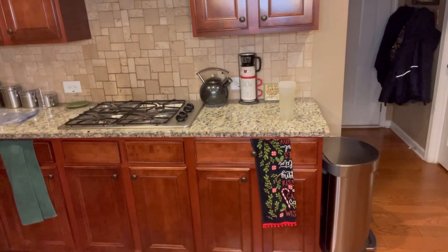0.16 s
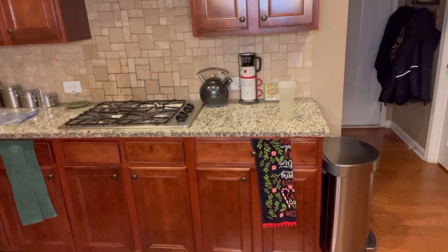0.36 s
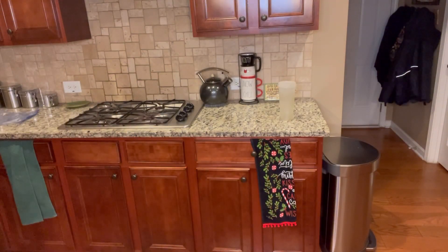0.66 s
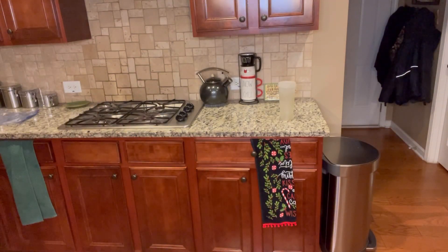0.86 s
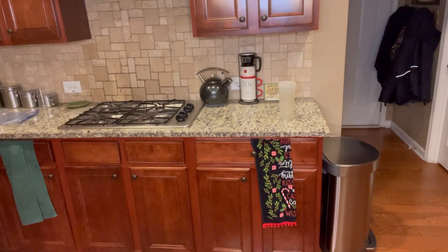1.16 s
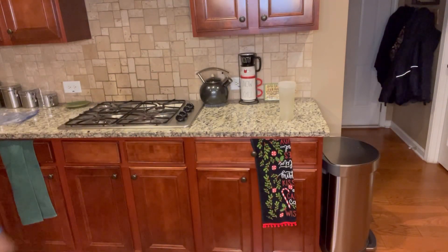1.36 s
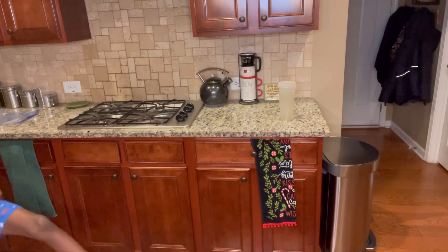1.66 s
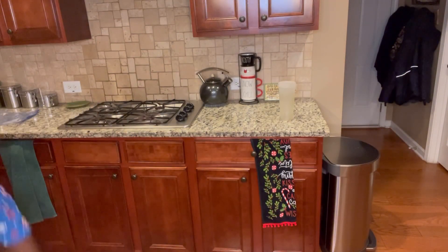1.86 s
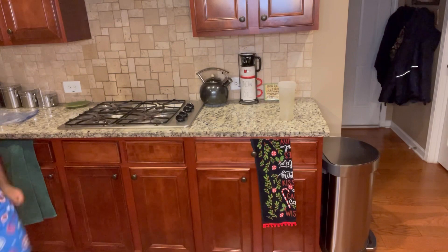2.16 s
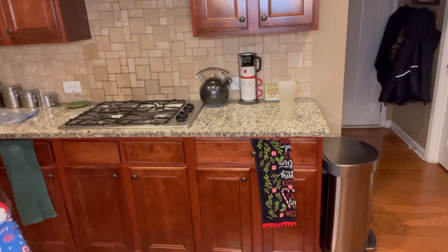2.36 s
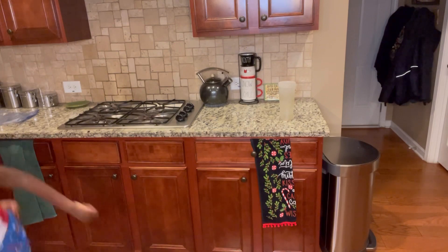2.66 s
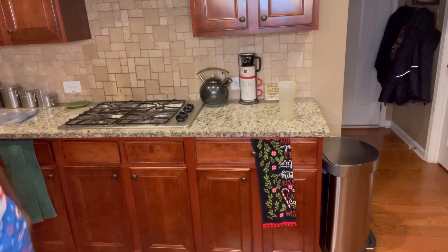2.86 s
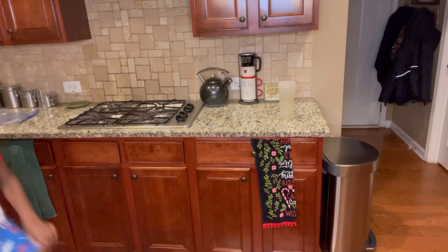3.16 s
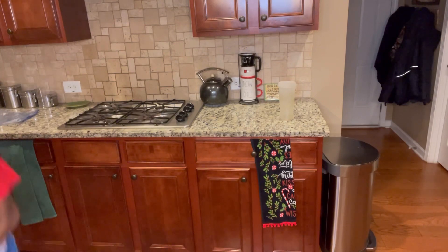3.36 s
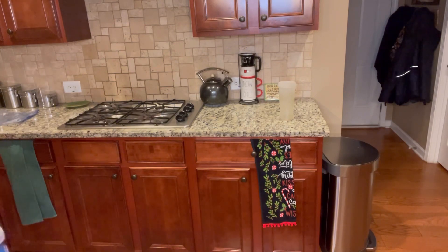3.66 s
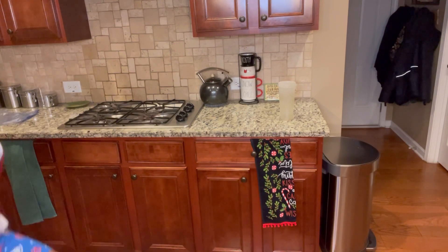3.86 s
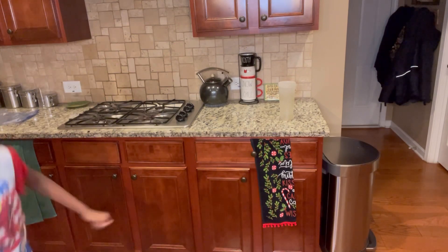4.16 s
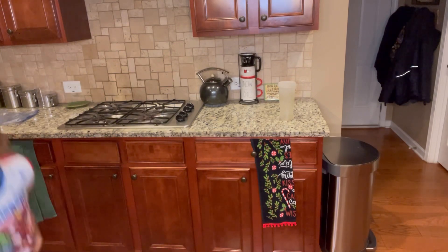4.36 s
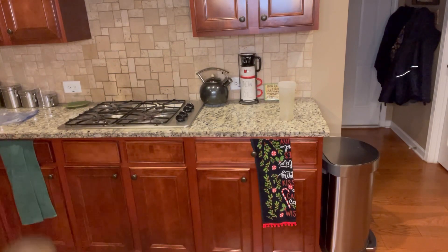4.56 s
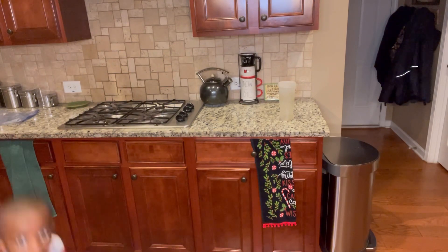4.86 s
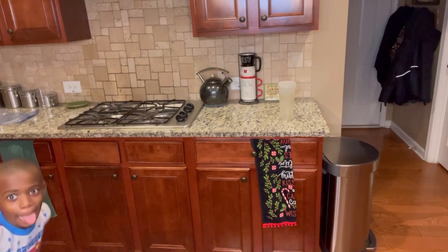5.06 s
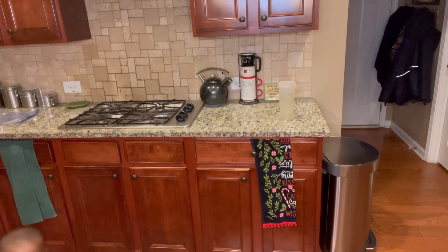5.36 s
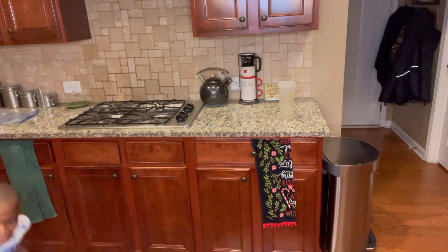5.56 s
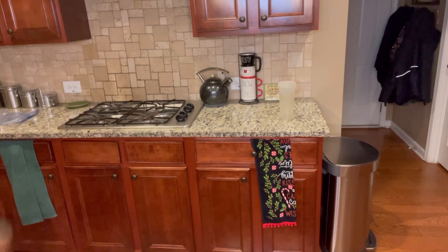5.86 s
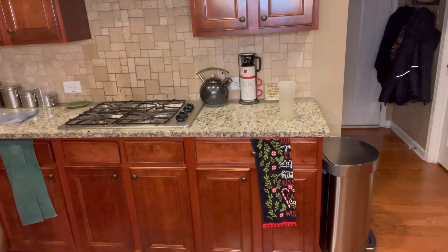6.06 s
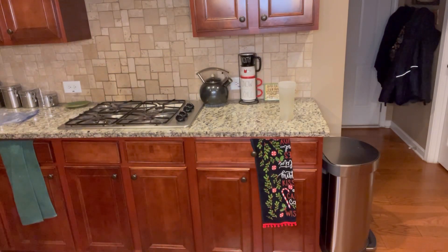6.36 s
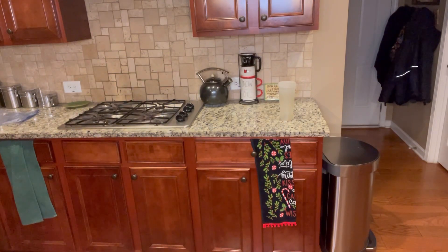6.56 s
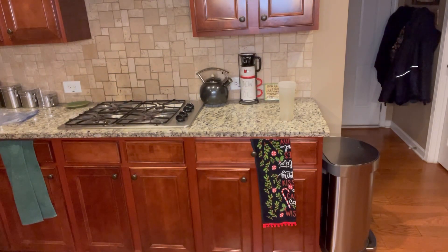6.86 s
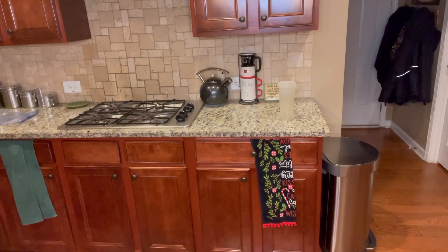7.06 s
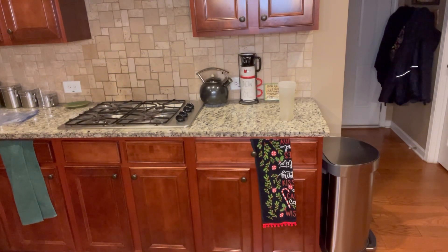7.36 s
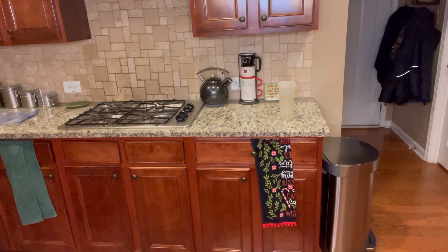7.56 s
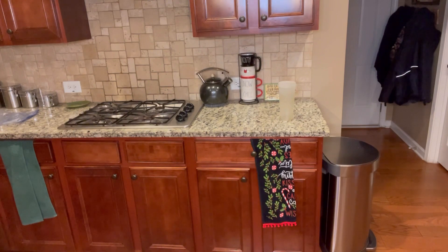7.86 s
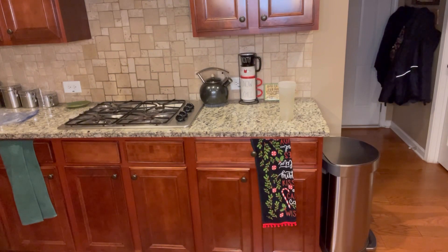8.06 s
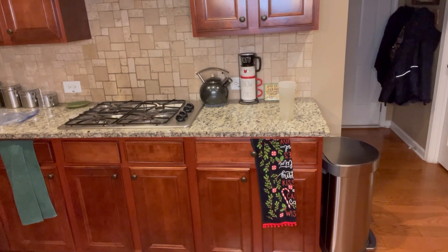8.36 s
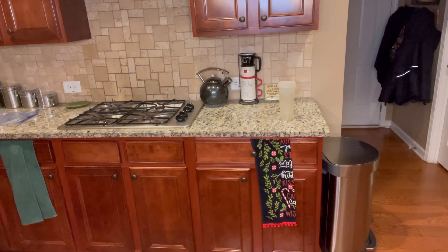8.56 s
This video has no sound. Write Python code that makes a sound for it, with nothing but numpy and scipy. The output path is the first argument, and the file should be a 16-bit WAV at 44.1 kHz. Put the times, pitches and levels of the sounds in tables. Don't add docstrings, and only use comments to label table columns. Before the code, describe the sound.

A reverberant home kitchen with faint low house rumble, heard in stereo from a phone near the cupboards. From 0.1 to 0.75 s objects shift on shelves in quick clicks, snaps and woody knocks, over dragging and a faint hollow hum around 340 Hz. A solid bare footfall lands at 0.87 s, with more thuds and knocks around 1.5 s. Lighter steps and cloth rubs continue to 3 s. From 3.1 to 4.2 s comes the busiest clatter: a drawer runs and rattles, hitting its stop at 3.68 s, then a bright hard strike at 4.04 s. Steps and scuffs follow at 4.4-5.2 s, with a tiny hinge squeak at 5.25 s and a knock at 5.44 s. It grows sparse after 6 s; drag and a footfall build from 7.1 s, and at 7.95 s a door slams sharply with a deep airy boom. A faint click closes around 8.5-8.65 s.

```python
import sys
import numpy as np
from scipy import signal
from scipy.fft import rfft, irfft, next_fast_len
from scipy.io import wavfile
from scipy.ndimage import uniform_filter1d

SR = 44100
rng = np.random.default_rng(int(sys.argv[2]) if len(sys.argv) > 2 else 0)


def ratio_of_db(decibels):
    return 10 ** (np.asarray(decibels, float) / 20)


def unload_audio(sound):
    columns = np.transpose(np.atleast_2d(sound))
    steps = np.round(np.clip(columns, -1, 1) * 32767)
    wavfile.write(sys.argv[1], SR, steps.astype(np.int16))


N = 384552
PORT_LAG = 20


def unit(x):
    return x / np.sqrt(np.mean(x ** 2) + 1e-20)


def smooth_noise(size):
    once = uniform_filter1d(rng.standard_normal(N), size=size)
    return unit(uniform_filter1d(once, size=size))


def along(points, hz):
    f, v = np.transpose(points)
    return np.interp(np.log(hz + 1), np.log(f + 1), v)


def resonances(hz, modes):
    total = 0
    for k, (centre, width, db) in enumerate(modes):
        damping = 1j * hz * width
        total = total + (-1) ** k * ratio_of_db(db) * damping / (centre * centre - hz * hz + damping)
    return total


def add(out, s, sound):
    part = out[:, round(s * SR):][:, :sound.shape[1]]
    part += sound[:, :part.shape[1]]


# (frequency [Hz], t60 [s])
ROOM_DECAY = [(60, 0.26), (150, 0.66), (1000, 0.73), (4000, 0.66), (8000, 0.52), (14000, 0.43)]


def rooms(count, wet_db, early_db, early_t60):
    hz, t = np.fft.rfftfreq(256, 1 / SR), np.arange(175) * 128 / SR
    z = rng.standard_normal((count, 2, len(hz), 2 * len(t))).view(complex) / 16
    decay = ratio_of_db(-60 * t / along(ROOM_DECAY, hz)[:, None])
    tail = signal.istft(z * decay, SR, window="cosine", nperseg=256)[1]
    t = np.arange(tail.shape[2]) / SR
    early = 1 + ratio_of_db(early_db - 60 * t / early_t60)
    build = 1 - np.exp(-t / 0.0012)
    tail = ratio_of_db(wet_db) * tail * early * build * (1 - (t / t[-1]) ** 4)
    tail[:, 1, 0] += 1
    tail[:, 0, PORT_LAG] += 1
    return tail


# (time [s], slap level [dB], thump level [dB], edge level [dB], slap pitch [Hz])
FOOTSTEPS = [(0.869, -8.5, -29.5, -63, 257), (1.514, -17.5, -42, -34.5, 215), (1.684, -34, -67, -49.5, 350),
             (1.93, -32, -35, -54, 296), (2.281, -26, -38, -45, 212), (2.643, -35, -38.5, -50.5, 460),
             (2.977, -21, -29, -39, 252), (4.48, -21, -26, -50.5, 365), (5.155, -16.5, -28, -44, 296),
             (5.786, -43, -41, -72, 205), (5.85, -49, -39, -58, 650), (6.243, -43, -44.5, -63, 200),
             (7.604, -20.5, -30.5, -47.5, 249)]
# (time [s], knock level [dB], thump level [dB], pitch [Hz])
DOOR_KNOCKS = [(0.406, -37, -49, 304), (0.638, -25.5, -42.5, 316), (1.458, -34, -65, 217),
               (2.198, -45.5, -69, 420), (2.485, -37, -70, 334), (3.638, -19, -37, 242),
               (3.944, -24.5, -69, 330), (5.441, -31.5, -54, 317), (6.093, -40.5, -65, 327),
               (6.96, -35, -68, 201), (7.121, -40, -68, 292), (7.679, -30.5, -59, 290),
               (8.518, -41, -61, 337)]
# (time [s], knock level [dB], thump level [dB], edge level [dB], pitch [Hz])
SHIFTED_THINGS = [(0.141, -36.5, -56, -50, 690), (0.296, -36.5, -66, -35.5, 670),
                  (0.446, -30.5, -57, -58, 654), (0.494, -38, -46, -36, 331), (0.699, -35, -57, -43.5, 604),
                  (3.382, -26.5, -62.5, -43.5, 525), (3.569, -24, -61, -30.5, 462),
                  (3.87, -29, -49, -31.5, 426), (4.416, -31.5, -51.5, -40.5, 595),
                  (4.734, -33, -55, -42, 627), (7.826, -35, -45, -40, 296)]
# (time [s], knock level [dB], thump level [dB], edge level [dB], pitch [Hz])
OPEN_STRIKES = [(0.221, -32, -66, -55, 650), (3.163, -31.5, -76.5, -36, 796), (3.361, -25, -41, -43, 757),
                (3.679, -17, -39.5, -23.5, 445), (4.039, -11.5, -34, -18.5, 461),
                (8.653, -70, -72, -44.5, 810)]
# (frequency [Hz], width [Hz], level [dB])
FLOORBOARDS = [(65, 11, -9), (117.8, 9.1, 7), (179, 18, -11)]
# (frequency over pitch [ratio], width over pitch [ratio], level [dB])
PANEL = [(0.979, 0.12, 5), (1.382, 0.36, -1.5), (2.7, 0.8, -18.5), (0.56, 0.14, 0.5)]


def knocks():
    blows = [(*row, -10) for row in FOOTSTEPS]
    blows += [(s, db, thump, db - 17.5, hz, -2.5) for s, db, thump, hz in DOOR_KNOCKS]
    blows += [(*row, -16) for row in SHIFTED_THINGS]
    blows += [(*row, -5) for row in OPEN_STRIKES]
    heel_s = 0.01765
    softness = 3.87
    boards_near_db, boards_wet_db = 4.5, -5
    out = np.zeros((2, N))
    answers = rooms(count=len(blows), wet_db=-22.0, early_db=8.0, early_t60=0.18)
    m = next_fast_len(answers.shape[2] + SR // 8)
    hz = np.fft.rfftfreq(m, 1 / SR)
    lag = np.exp(-2j * np.pi * hz * PORT_LAG / SR)
    direct = np.array([lag, lag ** 0])
    floor = resonances(hz, FLOORBOARDS) / (1 + 1j * hz / 250) ** 2
    floor = floor * np.exp(-2j * np.pi * hz * heel_s)
    edge = resonances(hz, [(970, 520, 4.5), (1157, 43, 8.5), (1500, 7300, -8.0)]) / (1 + 1j * hz / 2500)
    for (s, knock_db, thump_db, edge_db, pitch, near_db), answer in zip(blows, answers):
        path = rfft(answer, m) + ratio_of_db(near_db) * direct
        modes = [(pitch * ratio, pitch * width, db) for ratio, width, db in PANEL]
        panel = resonances(hz, modes) / (1 + 1j * hz / (softness * pitch)) ** 2
        boards = ratio_of_db(thump_db + 45) * floor * (ratio_of_db(boards_near_db) + ratio_of_db(boards_wet_db) * path)
        wood = ratio_of_db(knock_db + 22.5) * panel + ratio_of_db(edge_db + 20.0) * edge
        add(out, s, irfft(boards + path * wood, m)[:, :answer.shape[1]])
    return out


# (time [s], click level [dB], tick level [dB], pitch [Hz])
CATCHES = [(0.4456, -18.5, -41, 1320), (0.498, -21, -55.5, 1500), (1.112, -41, -41.5, 1830),
           (1.349, -64, -57.5, 2530), (1.8187, -66, -62, 1420), (1.9276, -50.5, -55, 1450),
           (2.1625, -49.5, -60, 3020), (2.279, -45, -49.5, 1440), (2.483, -36, -59, 2120),
           (2.979, -41, -48.5, 1400), (3.079, -46, -47.5, 2060), (3.1582, -44.5, -37.5, 1400),
           (3.3575, -24.5, -52, 1570), (3.68, -13.5, -48.5, 1500), (3.8719, -18.5, -37, 1290),
           (4.0403, -13.5, -25.5, 1450), (4.213, -18, -33, 1500), (4.839, -39.5, -50.5, 2110),
           (6.7391, -40.5, -56.5, 2300), (8.653, -65, -72.5, 2740)]
# (time [s], click level
# [dB], tick level [dB], pitch [Hz])
SCUFFS = [(0.139, -32, -52.5, 1860), (0.2942, -20.5, -48, 1840), (0.636, -21.5, -47, 1530),
          (0.703, -14, -61, 1500), (0.8678, -25.5, -40, 2770), (1.462, -27, -58, 1780),
          (1.515, -22.5, -43.5, 1850), (1.684, -47, -68, 1710), (2.8429, -27.5, -39.5, 2510),
          (3.4553, -47.5, -51, 1500), (3.547, -35.5, -32.5, 2450), (4.415, -36.5, -38.5, 1410),
          (5.158, -37, -47.5, 1600), (5.438, -28.5, -38.5, 2180), (6.0947, -38.5, -54, 1260),
          (6.2504, -45, -63, 1890), (6.906, -60, -66, 1900), (7.6064, -57, -71, 2600),
          (7.684, -25, -75, 1530), (7.827, -29.5, -40.5, 2130), (7.9449, -9, -24, 1820),
          (7.954, -23, -78, 1900), (8.548, -35, -89, 1650)]


def clicks():
    # air band over the tick [dB], direct sound [dB]
    hits = [(*row, -12.5, 10) for row in CATCHES] + [(*row, -6, -1.5) for row in SCUFFS]
    small_is_bright = 0.31
    out = np.zeros((2, N))
    answers = rooms(count=len(hits), wet_db=-20.0, early_db=-9.5, early_t60=0.12)
    m = next_fast_len(answers.shape[2] + SR // 8)
    hz, t = np.fft.rfftfreq(m, 1 / SR), np.arange(SR // 50) / SR
    air = resonances(hz, [(10100, 5900, 0.025)]) ** 2
    tick = resonances(hz, [(5920, 8600, 0.038)]) ** 2
    for (s, click_db, tick_db, pitch, air_db, near_db), answer in zip(hits, answers):
        crack = rng.standard_normal(len(t)) * ratio_of_db(-60 * t / 0.0002)
        crack = ratio_of_db(near_db) * crack / np.linalg.norm(crack)
        path = rfft(answer, m) + rfft([np.roll(crack, PORT_LAG), crack], m)
        click = resonances(hz, [(pitch, .55 * pitch, 0)]) ** 2
        airy = ratio_of_db(air_db - small_is_bright * (click_db + 30.0)) * air
        colour = ratio_of_db(click_db + 10.5) * click + ratio_of_db(tick_db + 17.0) * (tick + airy)
        add(out, s, irfft(path * colour, m)[:, :answer.shape[1]])
    return out


# (time [s], level [dB], frequency [Hz], t60 [s])
SNAPS = [(0.293, -38, 4300, .006), (0.447, -37, 4310, 0.014), (0.446, -45, 1500, .025),
         (0.449, -45, 810, 0.027), (0.456, -23, 900, 0.019), (0.4947, -27.5, 4430, 0.0047),
         (0.497, -46, 750, .02), (0.4955, -37, 1900, .006), (0.703, -38.5, 1820, 0.067),
         (0.702, -40, 2865, 0.19), (0.742, -37, 1457, .15), (1.687, -52, 1500, .02), (2.2, -58, 900, 0.028),
         (2.282, -37, 1400, 0.015), (2.976, -30, 694, 0.037), (3.08, -42.5, 4310, .03),
         (3.159, -30.5, 9560, 0.028), (3.161, -43.5, 4670, .04), (3.163, -31, 1470, 0.042),
         (3.362, -31, 1690, 0.027), (3.352, -36.5, 614, .03), (3.84, -52.5, 9200, .004),
         (3.862, -53.5, 10500, .004), (4.412, -29.5, 6030, 0.0063), (4.412, -31, 10600, .004),
         (5.155, -53, 514, 0.015), (5.437, -49, 2240, 0.18), (5.44, -42, 1340, 0.11),
         (6.739, -55, 1960, 0.026), (6.739, -53, 4040, 0.041), (7.828, -45, 920, 0.033),
         (8.523, -52, 920, 0.052)]
# (time [s], level [dB], frequency [Hz], t60 [s])
DRAWER_RATTLE = [
    (3.4909, -39, 1340, 0.013),
    (3.5203, -38.5, 1810, 0.012),
    (3.5348, -32, 2770, 0.012),
    (3.5357, -36.5, 2350, 0.012),
    (3.5477, -28, 2360, 0.018),
    (3.5717, -12.5, 1210, 0.013),
    (3.645, -26.5, 1290, 0.013),
    (3.681, -4.5, 1370, 0.0089),
]
# (time [s], level [dB], frequency [Hz], t60 [s])
SHELF_KNOCKS = [(0.359, -30, 354, 0.05), (0.406, -22, 334, 0.054), (0.549, -30, 326, 0.062),
                (0.719, -32, 420, 0.089), (0.739, -45, 480, 0.046), (1.52, -16, 215.3, 0.15),
                (1.93, -35, 297, 0.12), (2.519, -42, 434, 0.088), (3.162, -40, 714, 0.032),
                (3.569, -24, 448, 0.05), (3.64, -13.5, 231, 0.057), (4.482, -26, 207, 0.1),
                (4.735, -38, 592, 0.046), (5.163, -22, 298, 0.043), (5.509, -33, 326, 0.042),
                (5.789, -44, 229, 0.046), (6.419, -57, 444, 0.041), (7.825, -29, 298, 0.075)]
# (time [s], level [dB], frequency [Hz], t60 [s])
CLEAR_RINGS = [(0.108, -44, 900, 0.13), (0.14, -44, 690, 0.064), (0.297, -30.5, 669, 0.18),
               (0.495, -34, 1000, .012), (0.456, -34, 1200, .015), (0.55, -42, 1880, 0.08),
               (1.13, -64, 4000, 0.074), (1.515, -30.5, 1130, .09), (1.55, -46.5, 1920, .12),
               (1.687, -38, 755, .05), (2.2, -43, 700, 0.037), (3.352, -36, 456, 0.028),
               (3.358, -24, 680, .03), (3.362, -12, 755, 0.019), (3.381, -22, 552, .05),
               (3.16, -30, 783, 0.06), (3.571, -30, 960, 0.055), (3.68, -15.5, 449, 0.065),
               (3.682, -21, 799, .1), (3.68, -21.5, 1670, 0.035), (3.735, -28, 348, 0.053),
               (3.735, -38, 2100, .03), (4.038, -13, 456, .14), (4.04, -10, 863, 0.065),
               (4.054, -16, 550, .1), (4.095, -27.5, 890, 0.086), (4.19, -42.5, 1330, 0.067),
               (4.213, -25, 1500, 0.0054), (4.254, -41, 1140, .05), (6.42, -50, 925, .05),
               (6.86, -57, 2200, 0.068), (6.9, -55, 1330, .15), (6.97, -51, 730, .08),
               (7.829, -49.5, 4160, 0.17), (7.9445, -26.5, 2180, 0.026), (7.945, -36, 4200, .03),
               (7.954, -40, 2110, 0.024), (7.97, -40, 2013, 0.39), (7.958, -41.5, 3590, 0.31),
               (7.959, -43, 4615, 0.39), (7.984, -11.5, 593, 0.091), (7.96, -16, 420, 0.084),
               (8.523, -54, 1500, 0.025)]


def snaps():
    # second mode level [dB], phase wander per cycle [rad]
    hits = [(*row, -10, 0.41) for row in SNAPS]
    hits += [(s, db - 6.5, hz, t60, -10, 0.41) for s, db, hz, t60 in DRAWER_RATTLE + SHELF_KNOCKS]
    hits += [(*row, -np.inf, 0.18) for row in CLEAR_RINGS]
    second_ratio, rise_cycles = 0.78, 0.31
    out, t = np.zeros((2, N)), np.arange(SR // 8) / SR
    lucks = rng.standard_normal((len(hits), 2, len(t)))
    for (s, db, hz, t60, second_db, rough), luck in zip(hits, lucks):
        wander = rough * hz / 2000 * np.sqrt(hz / SR) * np.cumsum(luck, axis=1)
        first = np.sin(2 * np.pi * hz * t + wander[0])
        second = np.sin(2 * np.pi * second_ratio * hz * t + wander[1] + luck[0, 0])
        rise = 1 - np.exp(-t * hz / rise_cycles)
        envelope = ratio_of_db(db - 60 * t / t60) * rise * (1 - (t / t[-1]) ** 4)
        ring = envelope * (first + ratio_of_db(second_db) * second)
        bounce_s = .003 + np.tanh(luck[1, 0]) / 1000
        bounce = ratio_of_db(-6.5) * np.roll(ring, round(SR * bounce_s))
        add(out, s, np.array([np.roll(ring, PORT_LAG) + bounce, ring - bounce]))
    return out


# (time [s], boom level [dB], panel level [dB])
SLAM = [
    (7.955, -5.5, -11),
]
# (frequency [Hz], level [dB], t60 [s])
SLAM_MODES = [(53.4, -3, 0.26), (65.7, 5.5, 0.2), (127, -8, 0.25), (290, -20, 0.15), (414, -13, 0.13),
              (587.6, -11.5, 0.19), (650, -36, 0.12)]


def slam():
    lag_cycles, rise_cycles = 0.85, 0.54
    out, t = np.zeros((2, N)), np.arange(SR // 2) / SR
    close = rooms(count=len(SLAM), wet_db=-43.0, early_db=-6, early_t60=0.099)
    far = rooms(count=len(SLAM), wet_db=-26.5, early_db=-8.0, early_t60=0.24)
    boom = np.zeros(len(t))
    for hz, db, t60 in SLAM_MODES:
        cycles = np.maximum(hz * t - lag_cycles, 0)
        boom += ratio_of_db(db - 60 * t / t60) * np.sin(2 * np.pi * cycles) * (1 - np.exp(-cycles / rise_cycles))
    boom *= 1 - np.exp(-t / 0.0052)
    hz = np.fft.rfftfreq(len(t), 1 / SR)
    panel_modes = [(124.0, 28, 9.0), (260, 83, 4.5), (388, 80, 3.0), (613, 89, 4.0), (1080, 1280, -9.0)]
    flap = irfft(resonances(hz, panel_modes) / (1 + 1j * hz / 900), len(t))
    for (s, boom_db, panel_db), near, answer in zip(SLAM, close, far):
        add(out, s, signal.fftconvolve(near, ratio_of_db(boom_db) * boom[None], axes=1))
        add(out, s, signal.fftconvolve(answer, ratio_of_db(panel_db + 36.5) * flap[None], axes=1))
    return out


# (start [s], length [s], frequency [Hz], level [dB], roughness [rad])
HOLLOW_HUMS = [(0.394, 0.057, 336.6, -38.5, 0.51), (0.47, 0.6, 340, -51, 0.19),
               (0.89, 0.15, 343.5, -41.5, 0.48), (1.02, 0.24, 343, -52.5, 0.5),
               (1.203, 0.19, 343.5, -44, 0.3), (2.165, 0.9, 343.4, -59, 0.27),
               (5.252, 0.11, 1680, -50, 1.7), (5.264, 0.045, 1810, -54, 1.8), (6.348, 0.15, 1766, -78, 1.6),
               (6.763, 0.11, 320, -58, 1.3), (6.95, 0.16, 340, -57.5, 0.78),
               (7.185, 0.33, 298.4, -55.5, 0.43), (7.589, 0.15, 299.8, -37.5, 0.87),
               (8.48, 0.12, 340, -51, 0.32)]


def hollow():
    swell_s = 0.023
    out, t = np.zeros(N), np.arange(N) / SR
    feed, shake = smooth_noise(900), smooth_noise(300)
    for s, length, hz, db, rough in HOLLOW_HUMS:
        fade = np.clip(np.minimum(t - s, s + length - t) / swell_s, 0, 1)
        on = fade > 0
        wander = .4 * feed[on] + rough * shake[on]
        gain = fade[on] * ratio_of_db(db + 3 + 4.5 * feed[on])
        out[on] += gain * np.sin(2 * np.pi * hz * t[on] + wander)
    return np.array([np.roll(out, PORT_LAG), out])


def rush(spectrum, patchy_db, grain_db):
    hz = np.fft.rfftfreq(1024, 1 / SR)
    z = rng.standard_normal((2, len(hz), 2 * (N // 512 + 3))).view(complex)
    patches = uniform_filter1d(rng.standard_normal(z.shape[1:]), size=12, axis=0)
    patches = unit(uniform_filter1d(patches, size=6, axis=1))
    gain = ratio_of_db(patchy_db * patches + along(spectrum, hz)[:, None])
    pair = signal.istft(z * gain, window="cosine", nperseg=1024)[1][:, :N]
    grain = unit(uniform_filter1d(rng.standard_normal(N), size=130))
    return unit(pair * ratio_of_db(grain_db * grain))


def strokes(rows, attack_s, fade_db_per_s):
    s, length, db, change_db = np.transpose(rows)[:4, :, None]
    t = np.arange(N // 64 + 1) * 64 / SR - s
    drift_db = change_db * np.clip(t / length, 0, 1)
    shape_db = db + drift_db - fade_db_per_s * np.maximum(t - length, 0)
    return (np.clip(t / attack_s, 0, 1) * ratio_of_db(shape_db)) ** 2


def stroke_gain(power, rest_db=-120, over_db=0):
    total = np.sqrt((power * ratio_of_db(over_db)[..., None] ** 2).sum(axis=0) + ratio_of_db(rest_db) ** 2)
    return np.interp(np.arange(N) / 64, np.arange(len(total)), total)


# (start [s], length [s], drag level [dB], change along it [dB],
# floor rumble over drag [dB])
DRAGS = [(0.0, 0.24, -56.5, -3, -1), (0.274, 0.78, -44, -3.5, -10), (0.884, 0.17, -44.5, -3, -3),
         (1.144, 0.34, -50.5, -2, 2), (1.62, 0.18, -54, -4, 8), (1.5, 0.081, -31.5, -13, 5),
         (2.143, 0.39, -55.5, -2.5, -30), (2.49, 0.075, -37, -1.5, -33), (2.57, 0.53, -48, -3.5, -6),
         (3.105, 0.51, -65, -1, -16), (3.502, 0.2, -47.5, 13.5, -7.5), (4.049, 0.19, -31, -9.5, -14),
         (4.31, 0.32, -44, -2, -16), (4.7, 0.46, -45, -21, -22), (5.113, 0.49, -45, -1.5, -5.5),
         (5.7, 0.13, -64, 14.5, 8), (6.878, 0.25, -50, -10.5, -22), (7.136, 0.61, -50.5, 5.5, -9),
         (7.572, 0.47, -62, 30.5, -10.5), (8.408, 0.33, -57, 3, 3)]
# (start [s], length [s], scrape level
# [dB], change along it [dB], cloth over scrape [dB])
RUBS = [(0.0, 0.21, -77.5, 14.5, -13), (0.105, 0.69, -65, 10.5, -13.5), (0.856, 0.075, -41, -5.5, -8),
        (1.05, 0.26, -64, -0.5, -6), (1.403, 0.3, -64, 3.5, -12), (1.743, 0.5, -83, 5.5, -5.5),
        (2.473, 0.5, -50, -3.5, -9), (3.042, 0.68, -57.5, -21.5, -28), (3.51, 0.13, -47.5, 6.5, -9.5),
        (3.67, 0.068, -42, -7.5, -25), (3.74, 0.51, -64.5, 20, -9.5), (4.053, 0.28, -47.5, -1, -15),
        (4.322, 0.29, -49.5, 2.5, -8), (4.66, 0.72, -50.5, -22.5, -11), (5.118, 0.4, -50, -1.5, -10),
        (5.427, 0.26, -49.5, -9, -9), (5.708, 0.17, -56, 0, -7.5), (5.91, 0.25, -64, -6, -10),
        (6.702, 0.126, -67, 3, -8), (6.88, 0.11, -60, 4, -9), (6.996, 0.33, -79, 14, -7),
        (7.313, 0.32, -65, 1, -3), (7.61, 0.43, -69, 13, -22.5), (8.275, 0.22, -69.5, -11, -36),
        (8.514, 0.15, -86, 29.5, -20.5)]
# (frequency [Hz], level per Hz [dB])
RUMBLE_COLOUR = [(15, -68.5), (25, -49.5), (54, -3.5), (91, -3), (119, -1.5), (190, -10), (260, -15),
                 (340, -47), (570, -120)]
DRAG_COLOUR = [(100, -91), (170, -8), (294, -1), (445, -5.5), (579, -8), (679, -7), (810, -14.5),
               (1400, -19.5), (1820, -68), (3080, -120)]
SCRAPE_COLOUR = [(530, -16), (900, -1), (1300, 3.5), (1450, 3), (2070, 0), (3210, -6.5), (4840, -5),
                 (8000, -22), (10400, -67), (17600, -120)]
CLOTH_COLOUR = [(3530, -26.5), (6000, -7.5), (7510, -8.5), (9820, -10), (12000, -6.5), (14500, -10.5),
                (15600, -23)]
QUIET_COLOUR = [(88, -23), (150, -11.5), (314, -6), (900, -20), (2000, -27), (2840, -40), (11400, -44),
                (14000, -54)]


def motion():
    drags = strokes(DRAGS, attack_s=0.04, fade_db_per_s=111.5)
    rubs = strokes(RUBS, attack_s=0.03, fade_db_per_s=130.5)
    rumble_gain = stroke_gain(drags, rest_db=-57, over_db=np.array(DRAGS)[:, -1])
    rumble = rumble_gain * rush(RUMBLE_COLOUR, patchy_db=1.0, grain_db=1.5)
    drag = stroke_gain(drags) * rush(DRAG_COLOUR, patchy_db=2, grain_db=-1.0)
    scrape = ratio_of_db(3.0) * stroke_gain(rubs) * rush(SCRAPE_COLOUR, patchy_db=.8, grain_db=1.5)
    cloth_gain = ratio_of_db(9.0) * stroke_gain(rubs, over_db=np.array(RUBS)[:, -1])
    cloth = cloth_gain * rush(CLOTH_COLOUR, patchy_db=1, grain_db=1.5)
    hush = ratio_of_db(-64) * rush(QUIET_COLOUR, patchy_db=0.5, grain_db=1)
    return rumble + drag + scrape + cloth + hush


def scene():
    return knocks() + clicks() + snaps() + slam() + hollow() + motion()


# (frequency [Hz], mid level [dB], side level [dB])
PORTS = [(59.4, 0, -16.5), (130, -4, -13.5), (330, -1, -5), (650, 1, 2.5), (1500, -2, -1), (3370, 3.5, 3),
         (6880, -4, -2), (7260, -5, 1.5), (7400, -6, -0.5), (9900, -3, -1.5), (14300, -8, -7.5),
         (15500, 5, -0.5)]


def phone_ports(dry):
    m = next_fast_len(N + 8192)
    hz = np.fft.rfftfreq(m, 1 / SR)
    f, *gains = np.transpose(PORTS)
    pair = rfft([dry[0] + dry[1], dry[0] - dry[1]], m) / np.sqrt(2)
    weights = ratio_of_db([along(np.transpose([f, g]), hz) for g in gains]) * (hz / (hz + 30j)) ** 2
    return irfft(pair * weights * (hz < 15750), m)[:, :N]


# (frequency [Hz], share of the sum [0-1], share of the
DROPS = [(6800, 0, 0), (7100, .4, 0), (7600, .45, 0), (8050, .3, .05), (8350, .04, .1), (9500, 0, .3),
         (10800, 0, .97), (13500, .03, .97), (14300, .25, .75), (15300, .9, .8)]


def drop_narrow_bands(pair):
    masking = 0.22
    hz, _, z = signal.stft(pair, SR, nperseg=1024)
    luck = uniform_filter1d(rng.standard_normal((2, 65, z.shape[2])), size=5, axis=2)
    luck = unit(uniform_filter1d(luck, size=2, axis=1))
    luck = np.repeat(luck, 8, axis=1)[:, :len(hz)]
    power = uniform_filter1d(np.abs(z) ** 2, size=3, axis=2) + 1e-16
    band = np.abs(uniform_filter1d(power, size=24, axis=1))
    share = np.log(band / power.sum(axis=1, keepdims=True))
    share = share - share.mean(axis=2, keepdims=True)
    share = share / (share.std(axis=2, keepdims=True) + 1e-9)
    rank = .5 + .5 * np.tanh(.85 * unit(luck + masking * share))
    f, *shares = np.transpose(DROPS)
    lost = np.array([along(np.transpose([f, p]), hz) for p in shares])[:, :, None]
    return signal.istft(z * (rank > lost), SR, nperseg=1024)[1][:, :N]


def band_limit(x):
    return signal.sosfilt(signal.butter(12, 15770, fs=SR, output="sos"), x)


def record(dry):
    mid, side = drop_narrow_bands(phone_ports(dry))
    mix = np.array([mid + side, mid - side])
    return band_limit(mix)


dry = scene()
out = record(dry)
unload_audio(out)
```